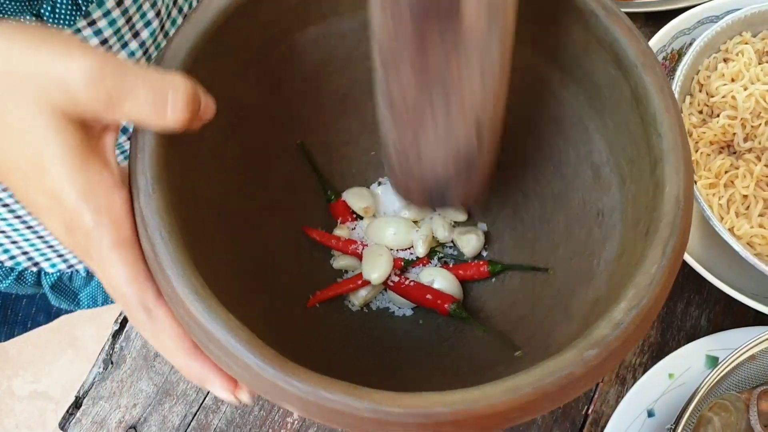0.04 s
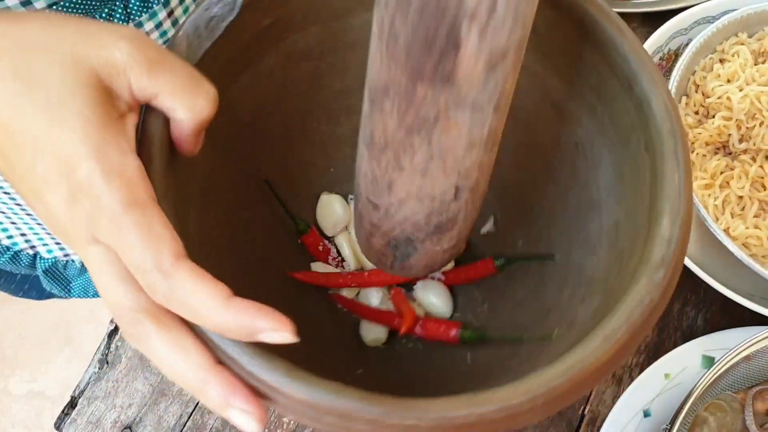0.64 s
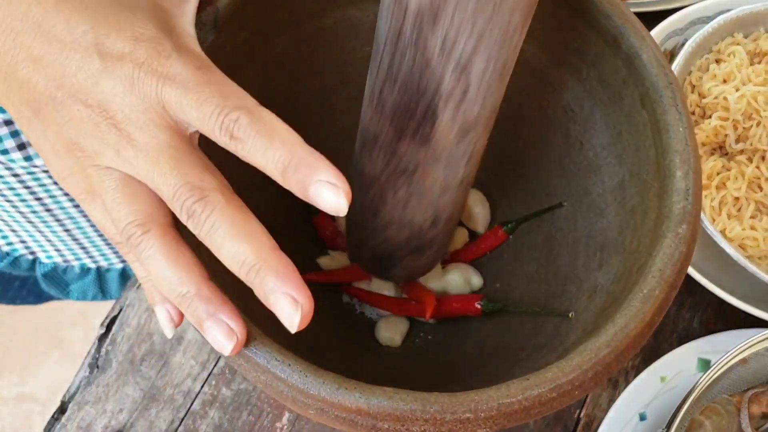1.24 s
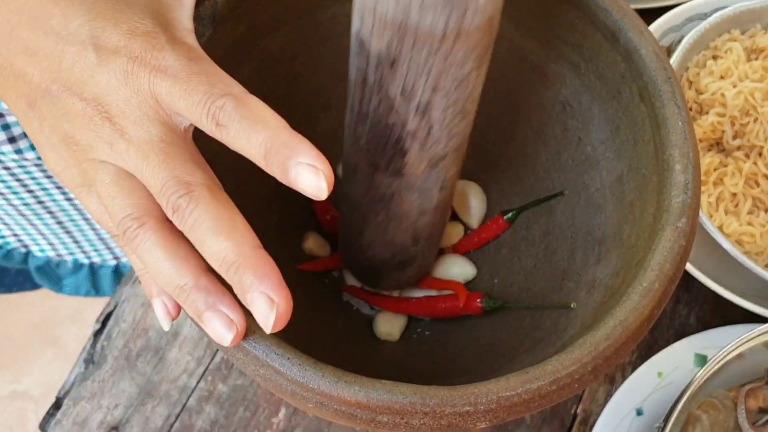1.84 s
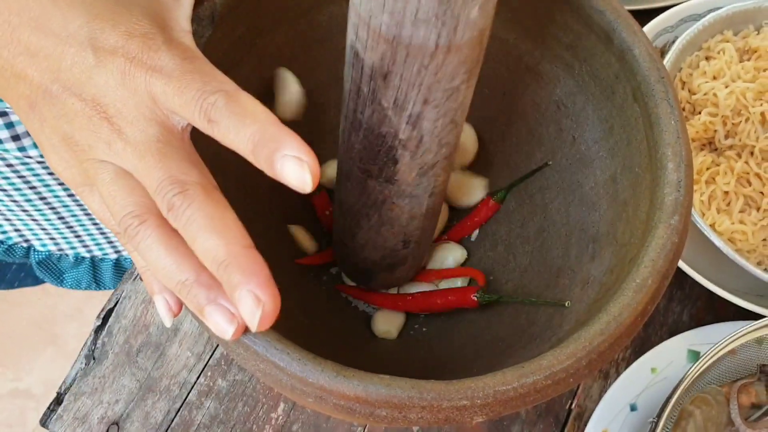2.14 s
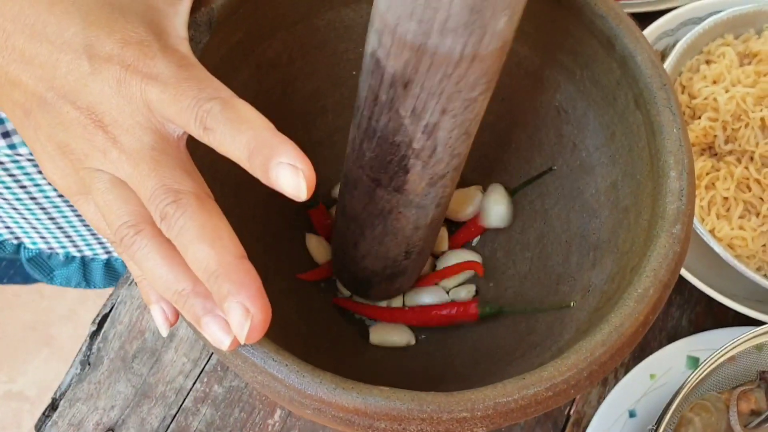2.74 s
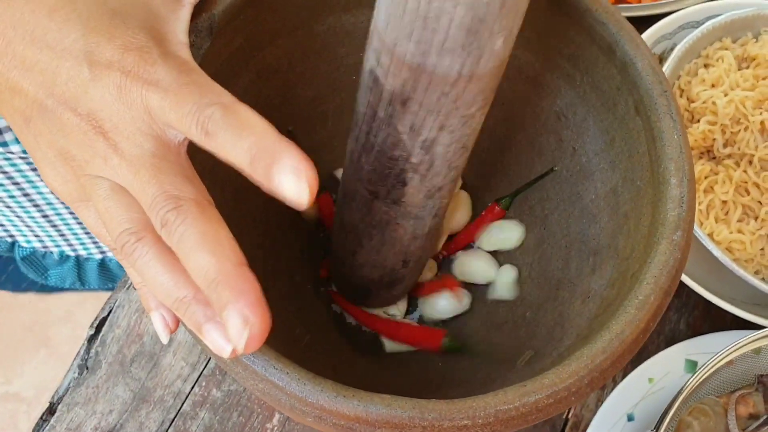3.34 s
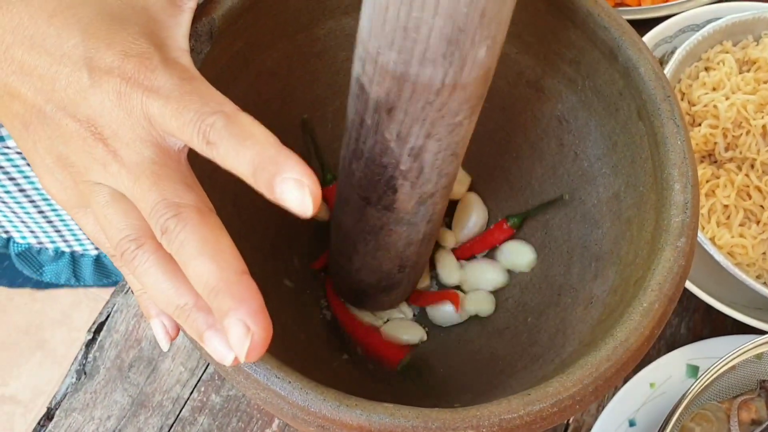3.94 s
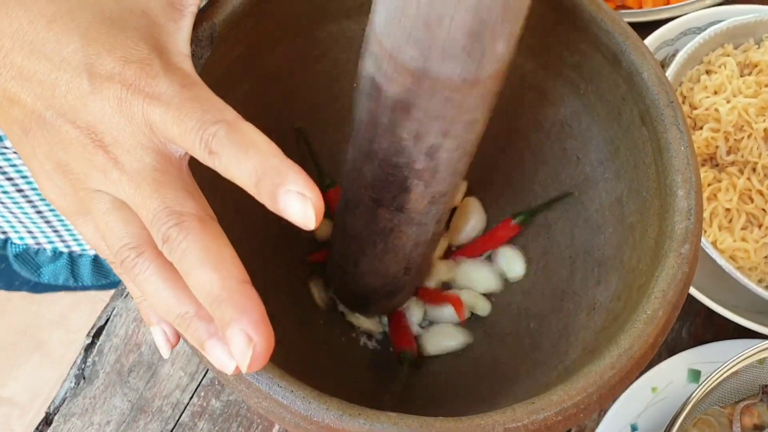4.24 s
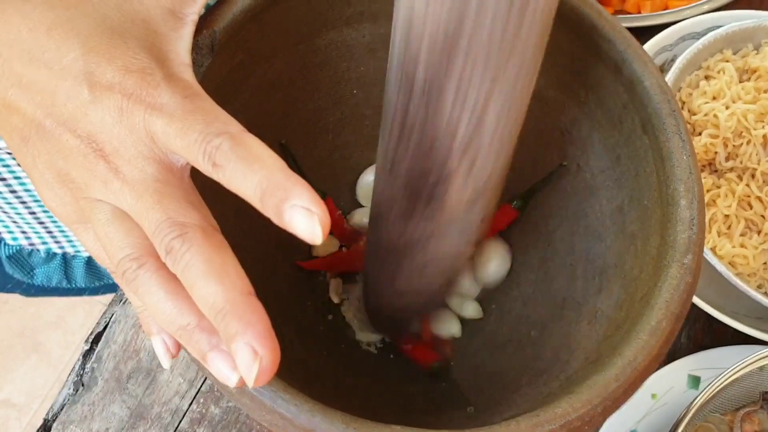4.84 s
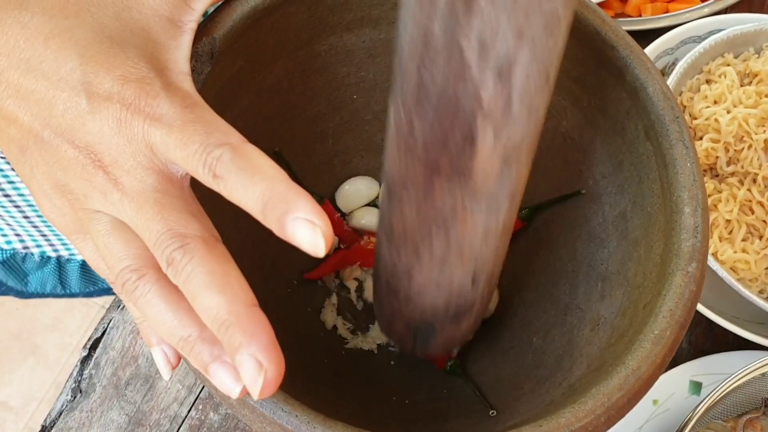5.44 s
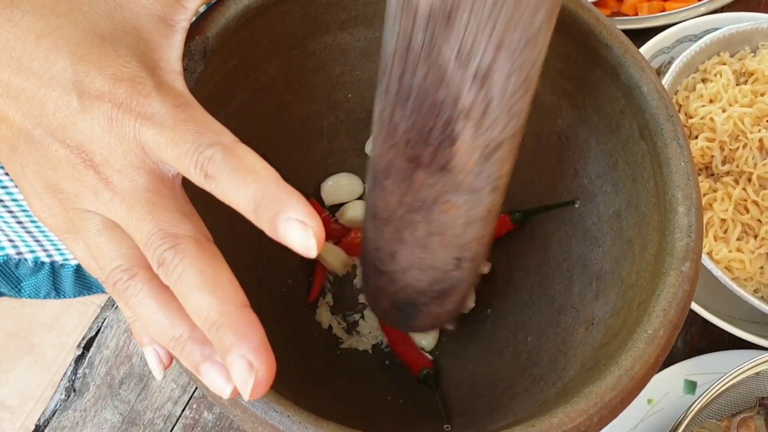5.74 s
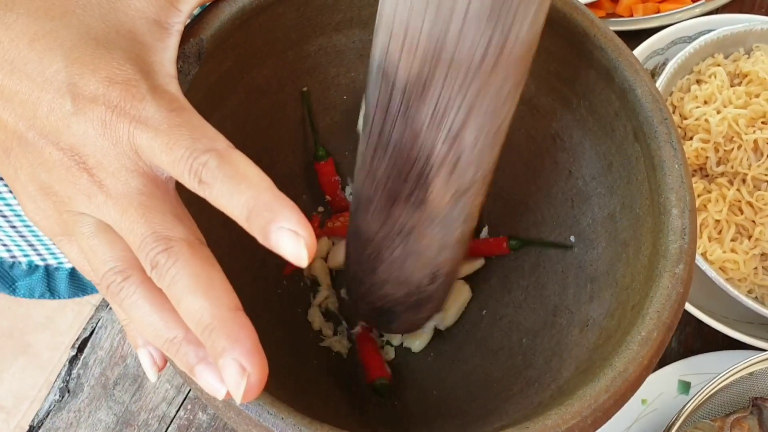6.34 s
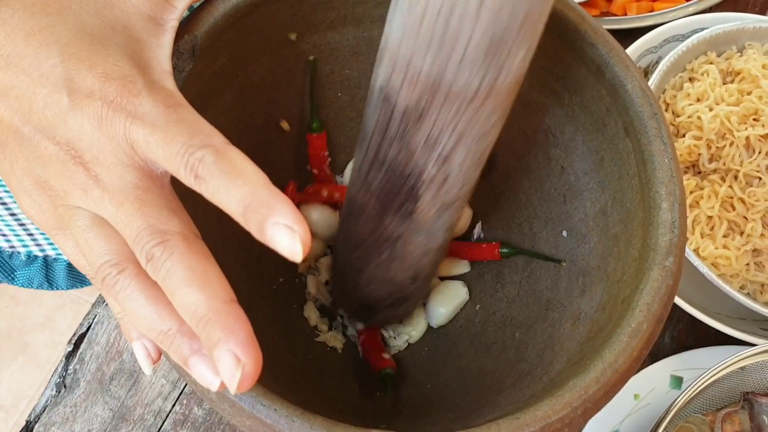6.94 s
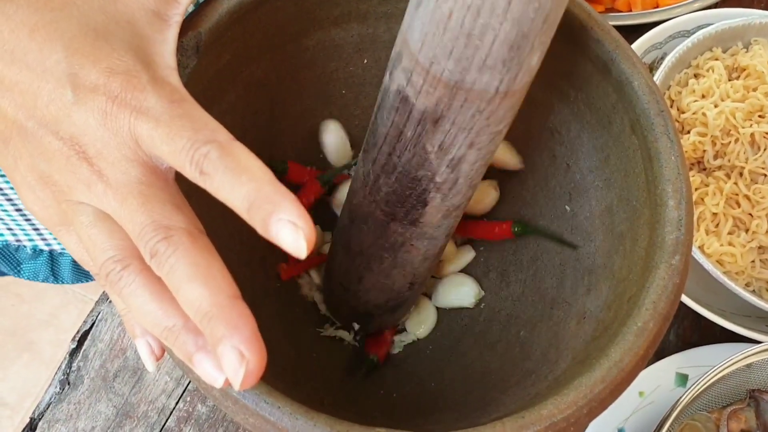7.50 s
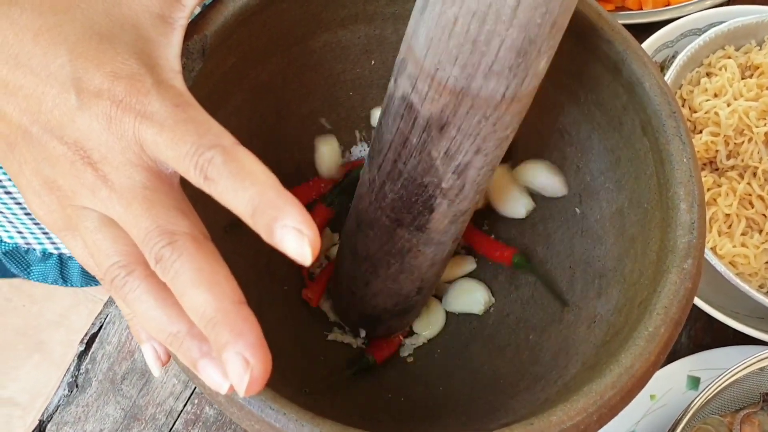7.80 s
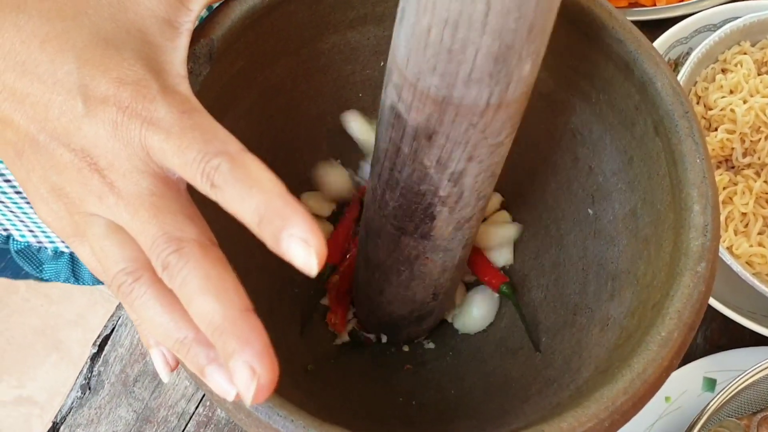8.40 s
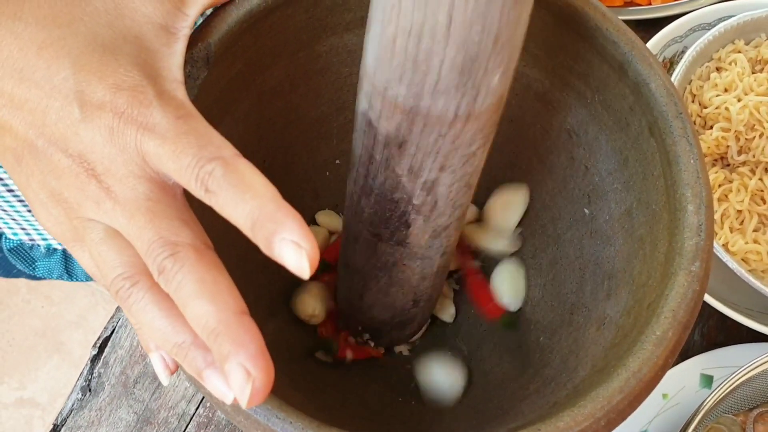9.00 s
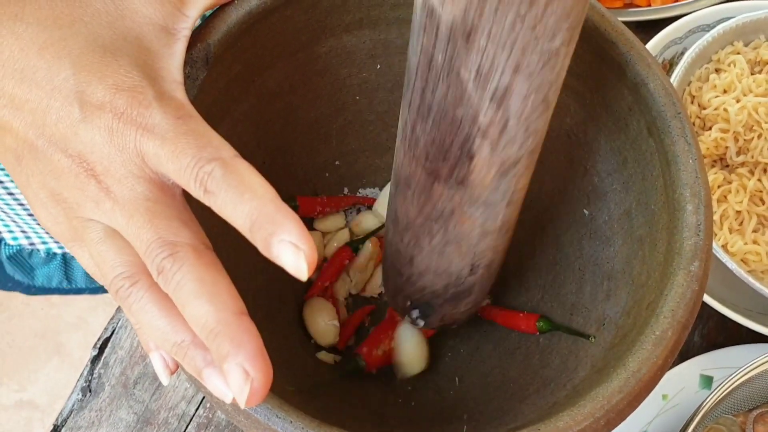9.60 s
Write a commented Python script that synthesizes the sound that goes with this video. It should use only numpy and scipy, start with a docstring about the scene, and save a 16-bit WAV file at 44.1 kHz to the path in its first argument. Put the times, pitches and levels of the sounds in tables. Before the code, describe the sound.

Steady dull thuds and moist crunches of garlic and chillies being pounded in a clay mortar, with occasional hollow knocks over a low rumble.

```python
"""Crunchy thumps, about three a second, sound over the low rumble of a half-open kitchen.
A wooden pestle is pounding garlic, chillies and salt in a clay mortar on a wooden table.
Each blow crunches through the food, thumps the table and rocks the mortar on its foot;
some reach the clay and knock. Bits of food snap and skitter, wet pulp pops, and a nearby dish chinks."""
import sys
import numpy as np
from scipy import signal
from scipy.io import wavfile

SR = 44100
rng = np.random.default_rng(int(sys.argv[2]) if len(sys.argv) > 2 else 0)


def transcribe(signal):
    """Save signal, clipped to [-1, 1], as a 16-bit WAV file at the path in sys.argv[1]."""
    frames = np.atleast_2d(signal).T
    limited = np.clip(frames, -1, 1)
    pcm = np.round(limited * 32767).astype(np.int16)
    wavfile.write(sys.argv[1], SR, pcm)


N = 426006
TIME = np.arange(N) / SR

# pestle strokes: first touch t/s, time to sink through the food/s, crunch/dB, hollowness/dB,
# weight/dB, softness/dB (the table's sway compared with its boom)
STROKES = [(0.219, .022, -28.5, 1.5, -21, 4), (0.537, 0.016, -21, 5.5, -18, -10),
           (0.871, 0.016, -21, -14, -12, 14), (1.182, 0.017, -19, 4, -12, -18),
           (1.513, 0.0074, -13, -1.5, -14.5, -12), (1.837, 0.0054, -12.5, 7, -10, -2),
           (2.146, 0.0055, -11.5, 0, -13, -17), (2.474, 0.0048, -12.5, 2, -11, 6.5),
           (2.783, 0.0067, -8.5, -7, -10.5, 3.5), (3.100, 0.0078, -12.5, 0, -11, -19),
           (3.429, 0.0046, -10.5, -1.5, -12, 8), (3.741, 0.01, -13, -20, -12, -13),
           (4.068, .007, -11.5, -5, -11.5, -8), (4.383, 0.017, -16.5, -29, -20.5, -9),
           (4.698, .011, -17.5, -14, -18.5, 8), (5.011, 0.024, -23.5, 2.5, -17.5, -7),
           (5.338, 0.0046, -15, -13, -19.5, -16), (5.647, 0.029, -28, 6, -17.5, -9),
           (5.987, .026, -41, 6, -25.5, 2), (6.305, 0.0086, -19, 1.5, -16.5, -1),
           (6.629, 0.00695, -11.5, 2, -18.5, 6), (6.947, 0.0046, -17.5, -16, -15.5, 10),
           (7.266, 0.022, -20, -23, -16.5, -5), (7.580, 0.013, -19.5, -3, -21, -15),
           (7.894, 0.019, -30, 1, -20.5, -6), (8.212, .008, -22.5, -21, -24, -4),
           (8.52, 0.011, -19.5, -18, -22.5, 2), (8.827, .031, -32, 1.5, -21.5, 2),
           (9.146, 0.022, -27.5, -25, -26.5, 3), (9.477, .026, -19.5, -10, -18.5, 0)]
# whole cloves that split before the pestle reaches the bottom: t/s, level/dB
CLOVES = [(0.224, -13), (0.538, -16), (0.874, -9.5), (3.428, -22), (5.987, -19), (8.841, -30),
          (9.150, -12.5), (9.481, -14.5)]


def from_db(db):
    return 10 ** (np.asarray(db) / 20)


def rms_one(x):
    return x / np.sqrt(np.mean(x ** 2) + 1e-20)


def at_hz(points, hz):
    """Read a value off a curve given as rows of f/Hz, value."""
    freqs, values = np.transpose(points)
    return np.interp(np.log(hz), np.log(freqs), values)


def filtered(x, hz, kind, order=2):
    sos = signal.butter(order, np.minimum(hz, .45 * SR), kind, fs=SR, output="sos")
    return signal.sosfilt(sos, x + 1e-18)


def add(track, s, sound):
    """Mix a sound into a track, starting at s seconds."""
    start = round(s * SR)
    track[..., start:start + sound.shape[-1]] += sound[..., :N - start]


def convolve(x, response):
    return signal.fftconvolve(np.atleast_2d(x), np.atleast_2d(response), axes=-1)[:, :N]


def pan(db):
    """Left and right gains, with the left louder by db."""
    return from_db(np.array([[db], [-db]]) / 2)


def burst(fade, rise=0.00057):
    """A quick rise and a smooth fade, both in seconds."""
    t = TIME[:SR // 4]
    return (1 - np.exp(-t / rise)) * np.exp(-t / max(fade, .0005))


def ringing(modes, phase_spread=0):
    """A struck object rings with fading tones (modes); t60 is the time each takes to drop 60 dB."""
    t = TIME[:SR // 2]
    return sum(from_db(db - 60 * t / t60) * np.sin(2 * np.pi * hz * t + phase_spread * rng.normal())
               for hz, db, t60 in modes)


def noise_bands(count=19):
    """Stereo noise in half-octave bands; the two ears hear much the same bass but unrelated treble."""
    # how alike left and right are: f/Hz, likeness (1 = the same)
    likeness = [(60, 0.93), (130, 0.96), (290, 0.91), (640, 0.52), (1400, 0.036), (3000, 0.019),
                (16000, 0.036)]
    white = rng.standard_normal((2, 2, N))
    for k in range(count):
        hz = 30 * 2 ** (k / 2)
        mid, side = filtered(white[k % 2], hz * 2 ** np.array([-.25, .25]), "band")
        alike = at_hz(likeness, hz)
        yield hz, np.sqrt(1 + alike) * mid + np.sqrt(1 - alike) * side * [[1], [-1]]


def coloured(noise, spectrum, lean=1):
    """Mix noise bands to follow a spectrum, leaning toward the mortar's side unless lean is 0."""
    # stereo balance: f/Hz, left minus right/dB
    balance = [(100, -3.5), (400, 2), (700, 1), (1300, -4.5), (2400, -8.5), (4400, -4), (8000, -6),
               (15000, -0.5)]
    return rms_one(sum(band * from_db(at_hz(spectrum, hz)) * pan(lean * at_hz(balance, hz))
                       for hz, band in noise))


def resonant_noise(hz, width_hz):
    """Stereo noise that rings around one pitch."""
    edges = hz * np.exp(np.array([-.5, .5]) * width_hz / hz)
    return rms_one(filtered(rng.standard_normal((2, N)), edges, "band"))


def graininess(spread_db, step=30):
    """A jittery level: tiny fractures come one every step samples, each with its own strength."""
    sizes = from_db(spread_db * np.clip(rng.standard_normal(N // step + 2), -2, 2))
    return rms_one(np.interp(np.arange(N) / step, np.arange(len(sizes)), sizes))


def rumble(noise):
    """A low rumble fills the kitchen and slowly drifts in loudness."""
    # tone of the rumble: f/Hz, level/dB
    spectrum = [(15, -41), (25, -23.5), (72, 3), (134, 0), (285, -17), (463, -21.5), (531, -15.5),
                (988, -26.5), (2220, -31.5), (3520, -37.5), (6050, -38), (8590, -50.5), (11900, -44),
                (14800, -65), (16000, -72)]
    # its loudness over time: t/s, level/dB
    loudness = [(0, -31.5), (3.0, -33), (5.8, -37.5), (9.66, -36.5)]
    return from_db(np.interp(TIME, *np.transpose(loudness))) * coloured(noise, spectrum, lean=0)


def kitchen_echo(dry, noise, near_db=-9, near_t60=0.028, far_db=-15):
    """Quick echoes come off the bowl and table, then a faint tail off the room; deep bass escapes."""
    # tone of the echoes: f/Hz, level/dB
    spectrum = [(60, -20.5), (200, 10), (500, -1), (1500, -6.5), (5000, -4), (16000, -2.5)]
    # how long the tail lasts: f/Hz, t60/s
    tail_t60 = [(100, 0.39), (500, 0.43), (1500, 0.66), (5000, 0.29), (14000, 0.29)]
    t = TIME[:SR // 2]
    near, far = 0, 0
    for hz, band in noise:
        piece = band[:, :len(t)] * from_db(at_hz(spectrum, hz)) * (hz > 100)
        near = near + piece * from_db(-60 * t / near_t60)
        far = far + piece[:, ::-1] * from_db(-60 * t / at_hz(tail_t60, hz))
    near = from_db(near_db) * rms_one(near * (1 - np.exp(-t / 0.002)))
    far = from_db(far_db) * rms_one(far * (1 - np.exp(-t / 0.0071)))
    return convolve(dry, (near + far) / np.sqrt(len(t)))


def chinks():
    """Dishes on the same table buzz against each other or ring faintly when a blow jolts them."""
    # jolts of the dish beside the mortar: t/s, level/dB
    jolts = [(2.802, -25), (3.121, -18)]
    # thin rings from crockery and a spoon: t/s, level/dB, f/Hz, t60/s
    pings = [(1.530, -41, 2370, 0.33), (1.860, -43, 6120, 0.32), (6.636, -35, 2370, 0.28)]
    # pitches at which the dish buzzes: f/Hz, width/Hz, level/dB
    dish = [(923, 110, 1), (1250, 270, -3), (1854, 91, 3.5), (2000, 120, 2), (2240, 180, -1.5),
            (2730, 200, -12)]
    force, rings = np.zeros((2, N))
    for s, db in jolts:
        add(force, s, from_db(db) * burst(fade=0.023, rise=0.00072))
    for s, db, hz, t60 in pings:
        add(rings, s, ringing([(hz, db, t60)]))
    buzz = rms_one(sum(from_db(db) * resonant_noise(hz, width) for hz, width, db in dish))
    return (force * buzz + rings) * pan(db=-11)


def rustle(hiss, rub_db=-54.5, lift_after_s=0.12, lift_width_s=.11):
    """Pulp and salt rub softly as the pestle lifts after each stroke."""
    # pulp sticking to the pestle and peeling off: middle t/s, level/dB, width/s
    peels = [(1.14, -44.5, 0.043), (4.31, -61, .06), (7.48, -51.5, 0.09), (7.725, -53, .04),
             (8.10, -49, 0.023)]
    lift = np.exp(-((TIME[:SR // 2] - lift_after_s) / lift_width_s) ** 2)
    rubbing = np.zeros(N)
    for s, *_ in STROKES:
        add(rubbing, s, from_db(rub_db) * lift)
    peeling = sum(from_db(db) * np.exp(-((TIME - s) / width) ** 2) for s, db, width in peels)
    return (rubbing + peeling) * graininess(spread_db=6, step=100) * hiss


def skitter(hiss, crumb_db=-49, spread_db=5, count=70):
    """Thrown crumbs patter back into the bowl at random moments."""
    landings = np.zeros(N)
    for s, size in zip(rng.uniform(0, TIME[-1], count), rng.standard_normal(count)):
        add(landings, s, from_db(crumb_db + spread_db * size) * burst(fade=0.002))
    return landings * hiss


def pops(width_s=0.00203, octaves_per_width=.15):
    """Pockets of air squeezed out of the wet pulp give short rising blips."""
    # escaping air: middle t/s, level/dB, f/Hz
    pockets = [(0.545, -14.5, 1458), (1.84, -23, 1562), (4.704, -27.5, 1385), (4.752, -30.5, 3010),
               (5.987, -19, 1480), (6.306, -24, 1436), (6.634, -16.5, 1695), (9.1516, -14, 1657)]
    out = np.zeros(N)
    t = TIME[:SR // 25] - TIME[SR // 50]
    age = np.clip(t / width_s, -4, 4)   # widths from the middle of the pop
    for s, db, hz in pockets:
        phase = 2 * np.pi * np.cumsum(hz * 2 ** (octaves_per_width * age)) / SR
        add(out, s + t[0], from_db(db) * np.exp(-age ** 2) * np.sin(phase))
    return out * pan(db=-4)


def snaps(boost_db=6):
    """Single salt grains and skins crack, each with a tick of noise one octave wide."""
    # brittle bits cracking or landing: t/s, level before the boost/dB, f/Hz
    bits = [(1.202, -7, 8060), (1.5204, -5, 2940), (2.486, -8, 4560), (3.432, -3.5, 5000),
            (4.077, -9, 6000), (5.859, -40, 9000), (5.99, -13, 5500), (6.009, -16, 4270),
            (6.95, -10.5, 7200), (7.911, -17, 5500), (8.092, -31, 7040), (8.769, -30, 5900),
            (8.859, -16, 2200), (8.876, -16, 7850), (9.1567, -9.5, 5900), (9.414, -33, 11000),
            (9.503, -12.5, 9500)]
    out = np.zeros((2, N))
    for s, db, hz in bits:
        octave = hz * 2 ** np.array([-.5, .5])
        crack = rms_one(filtered(rng.standard_normal((2, SR // 4)), octave, "band"))
        add(out, s, from_db(db + boost_db) * burst(fade=0.00092) * crack)
    return out * pan(db=-5)


def rocking(noise, first_s=0.00912, period_s=.0075, loss_db=3.5, count=8):
    """The mortar's foot chatters on the boards, once for each swing of the table."""
    # the mortar wobbling under the steadying hand: t/s, relative level/dB
    shifts = [(0.241, -22), (.648, -35), (.675, -38), (.768, -34.5), (0.926, -32), (.985, -34.5),
              (1.060, -40), (2.870, -33)]
    # tone of the chatter: f/Hz, level/dB
    spectrum = [(100, -5.5), (200, 1), (320, 2.5), (480, -1.5), (700, -0.5), (1000, -15), (2000, -21),
                (3500, -22.5), (8000, -37), (16000, -25)]
    heavy_db, growth = -12, 1.69   # weight of a heavy stroke; dB of rocking per dB of weight
    force = np.zeros(N)
    for s, sink, _, _, weight_db, _ in STROKES:
        rocking_db = -16.5 + growth * (weight_db - heavy_db)
        for k, (late, size) in enumerate(rng.standard_normal((count, 2))):
            tap_s = s + sink + first_s + k * period_s + 0.00074 * late
            tap_db = rocking_db - loss_db * k + 1.4 * size
            add(force, tap_s, from_db(tap_db) * burst(fade=0.0038))
    for s, db in shifts:
        add(force, s, from_db(db) * burst(fade=0.015, rise=0.0081))
    return filtered(from_db(8) * force * coloured(noise, spectrum), hz=90, kind="high")


def knocks(noise, clatter_db_per_octave=14.5):
    """The pestle hits the clay and rings it; a harder hit is brighter and bounces with more clatter."""
    # wood meeting clay: t/s, level/dB, hardness/Hz (the ring is muffled above it)
    hits = [(3.123, -21, 2600), (4.3985, -11, 830), (5.034, -9, 1270), (5.6706, -11, 2860),
            (6.0098, -9, 1480), (7.595, -12.5, 800), (7.911, -4.5, 1830), (8.2206, -20, 890)]
    # tones of the clay bowl: f/Hz, level/dB, t60/s
    bowl = [(404, -25, 0.02), (540.6, -2, 0.11), (527.6, -8, 0.12), (583, -10.5, 0.098), (620, -43, 0.061),
            (910, -7, 0.023), (1174, -6, 0.066), (1227, -21.5, 0.23), (1325, -22, 0.071), (1540, -30, 0.02),
            (1835, -11.5, 0.036), (2190, -35, 0.044), (2670, -21, 0.093)]
    # tone of the bouncing pestle: f/Hz, level/dB
    clatter = [(150, 13), (300, -2.5), (550, 9), (900, 4.5), (1300, 8), (1900, -5), (2800, -23),
               (5000, -18), (16000, -44)]
    rings, bounces = np.zeros((2, N))
    for s, db, hardness_hz in hits:
        ring = filtered(ringing(bowl, phase_spread=0.34), hardness_hz, "low", order=1)
        add(rings, s, -from_db(db) * ring)
        clatter_db = db - 15 + clatter_db_per_octave * np.log2(hardness_hz / 1500)
        add(bounces, s, from_db(clatter_db) * burst(fade=0.025))
    return filtered(rings * pan(db=-2) + bounces * coloured(noise, clatter), hz=70, kind="high")


def thumps(contact_s=0.004, nudge_db=-32, nudge_after_s=0.0034, clove_nudge_db=-7):
    """Food cushions each stroke into a push that booms the table top; a softer one sways the legs."""
    # tones of the table top: f/Hz, level/dB, t60/s
    table_top = [(120.7, 8, 0.21), (150.2, 1.5, 0.088), (277.4, -7, 0.15), (333.2, -7, 0.28)]
    # tones of its legs: f/Hz, level/dB, t60/s
    table_legs = [(62.2, 0.75, 0.29), (84, 2.2, 0.14)]
    out = np.zeros(N)
    boom, sway = ringing(table_top), ringing(table_legs)
    for s, sink, _, _, weight_db, soft_db in STROKES:
        soft = from_db(soft_db)
        add(out, s + sink, from_db(weight_db) * (boom + soft * sway) / np.hypot(1, soft))
        add(out, s + nudge_after_s, from_db(nudge_db) * boom)
    # a clove that holds out for a while passes a first nudge on to the table
    for s, db in CLOVES:
        add(out, s + nudge_after_s, from_db(db + clove_nudge_db) * boom)
    push = np.sin(np.pi * np.minimum(TIME[:SR // 20] / contact_s, 1)) ** 2
    cushioned = convolve(out, push / push.sum())
    # the boards' slowest motion makes almost no sound
    return filtered(cushioned, hz=47, kind="high", order=3) * pan(db=1.5)


def crunch(crush, fizz_hz=8000, settle_db=-17, settle_s=0.042):
    """Food breaks ever louder as the pestle sinks, then settles; the gap under its tip sounds hollow."""
    touch_db, usual_db = -31.5, -18   # crunch at first touch, and at the bottom of an ordinary stroke
    usual_fade_s, halving_db = .0085, 12.5   # a louder crunch is over sooner
    fizz_db, fizz_follows = -18, 0.69   # ordinary salt fizz; dB it gains per dB of extra crunch
    force, hollow, fizz = np.zeros((3, N))
    t = TIME[:SR // 4]
    for s, sink, crunch_db, hollow_db, _, _ in STROKES:
        since_bottom = np.maximum(t - sink, 0)
        extra_db = crunch_db - usual_db
        fade_s = usual_fade_s * 2 ** (-extra_db / halving_db)
        swell = from_db(np.interp(t, [0, sink], [touch_db, crunch_db])) * (1 - np.exp(-t / 0.0002))
        settling = from_db(settle_db) * np.exp(-since_bottom / settle_s)
        shape = swell * np.hypot(np.exp(-since_bottom / fade_s), settling)
        add(force, s, shape)
        add(hollow, s, shape * from_db(hollow_db))
        add(fizz, s, shape * from_db(fizz_db + fizz_follows * extra_db - crunch_db))
    for s, db in CLOVES:
        split = from_db(db) * burst(fade=0.0056, rise=0.00034)
        add(force, s, split)
        add(hollow, s, split * from_db(-2.5))
        add(fizz, s, split * from_db(-5))
    gap = from_db(-7) * resonant_noise(hz=1620, width_hz=1210) * pan(db=-4.5)
    # salt fizzes above fizz_hz; the minus sign lets the low and high parts join without a dip
    body = filtered(filtered(crush, fizz_hz, "low", order=1), fizz_hz, "low", order=1)
    top = -filtered(filtered(crush, fizz_hz, "high", order=1), fizz_hz, "high", order=1)
    # fractures come in clumps, as whole cells and skins give way
    fractures = graininess(spread_db=3.5) * graininess(spread_db=3, step=100)
    return fractures * (force * body + fizz * top + hollow * gap)


def scene():
    """Food, table, mortar and dishes sound together, with the kitchen's echo and rumble."""
    # tone of food being crushed: f/Hz, level/dB
    food_spectrum = [(200, 5.5), (500, 7.5), (900, -19), (1600, 3), (2800, -1.5), (4000, -0.5), (5400, 2),
                     (7000, -6), (9000, -3.5), (12000, -1), (16000, -9.5)]
    noise, other_noise = list(noise_bands()), list(noise_bands())
    crush = coloured(noise, food_spectrum)
    hiss = filtered(crush, hz=2000, kind="high")
    food = crunch(crush) + snaps() + skitter(hiss) + rustle(hiss) + pops()
    dry = food + thumps() + rocking(noise) + knocks(other_noise) + chinks()
    return dry + kitchen_echo(dry, noise) + rumble(other_noise)


def record(dry, ceiling=1.2, cutoff_hz=15700):
    """The microphone drops the deepest bass, rounds the loudest peaks and loses the highest treble."""
    rounded = ceiling * np.tanh(filtered(dry, hz=35, kind="high") / ceiling)
    return signal.sosfilt(signal.ellip(10, .2, 80, cutoff_hz, fs=SR, output="sos"), rounded)


dry = scene()
out = record(dry)
transcribe(out)
```